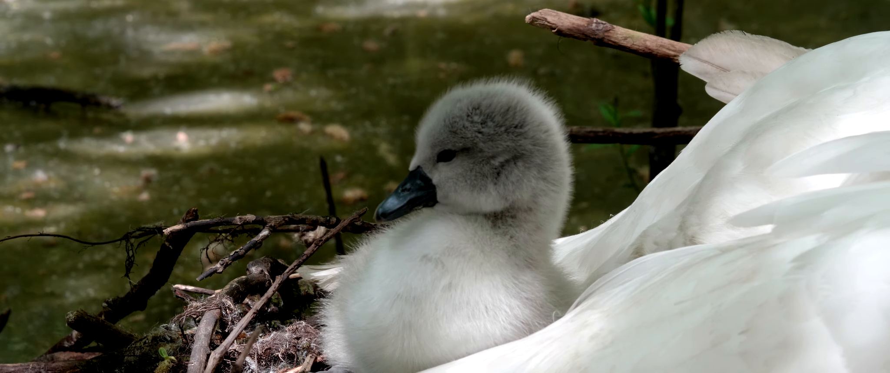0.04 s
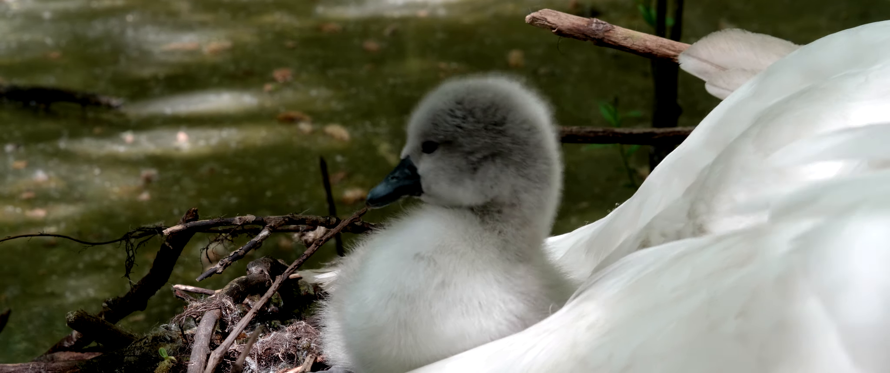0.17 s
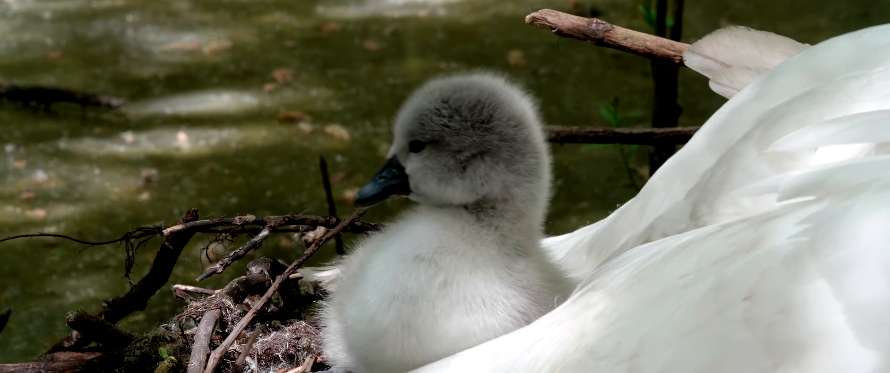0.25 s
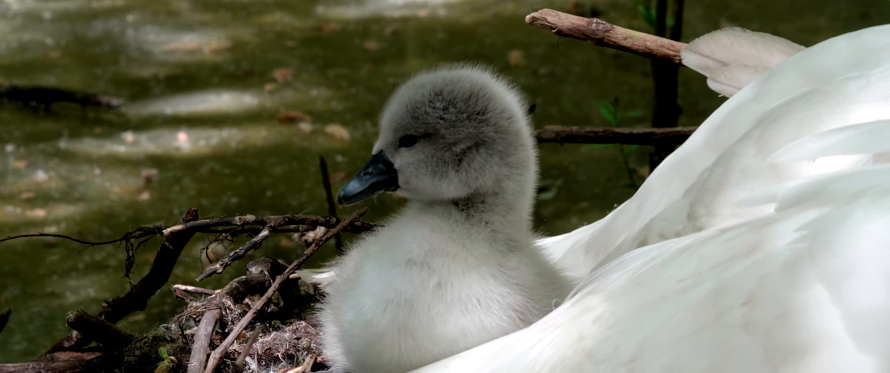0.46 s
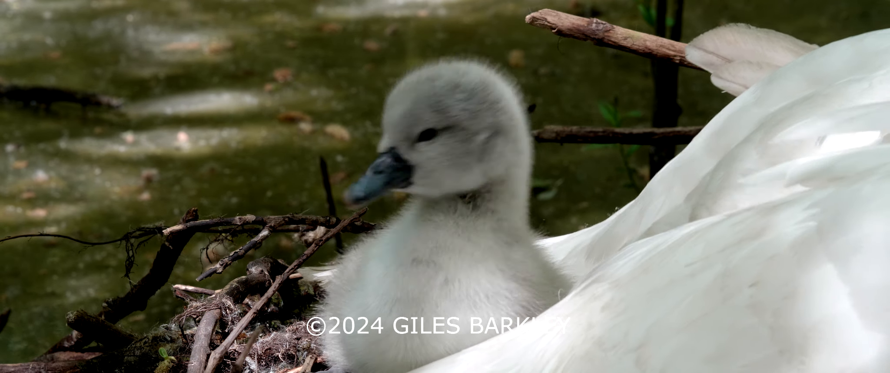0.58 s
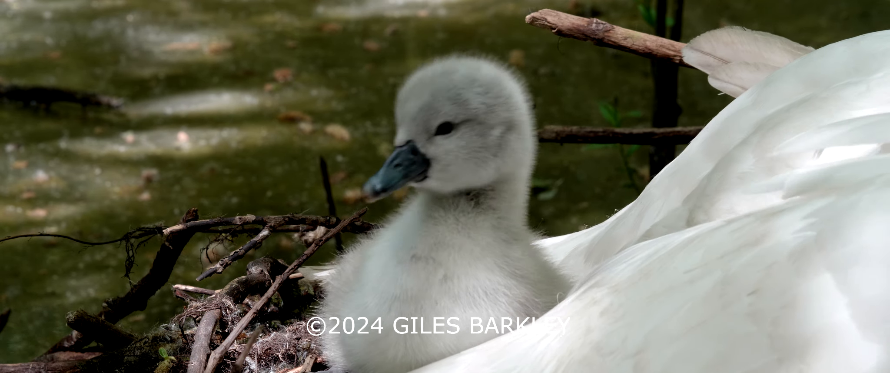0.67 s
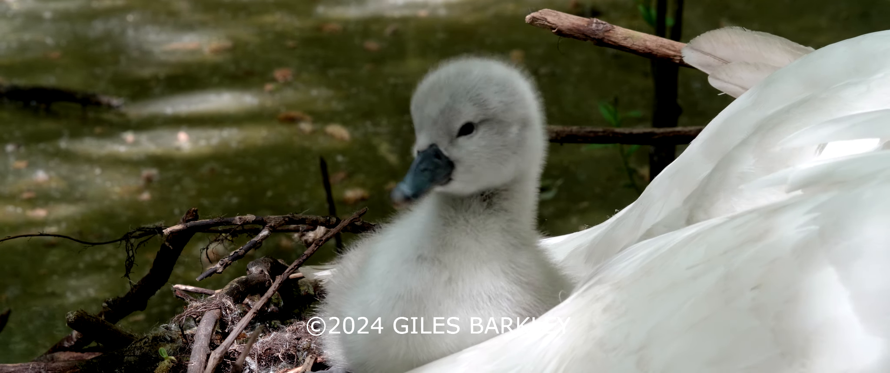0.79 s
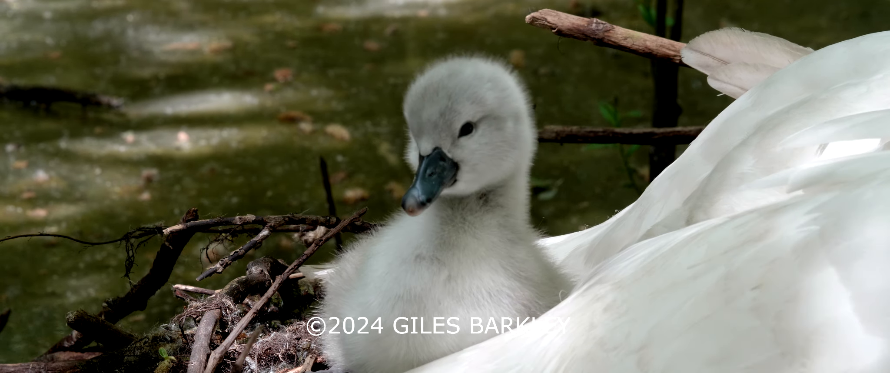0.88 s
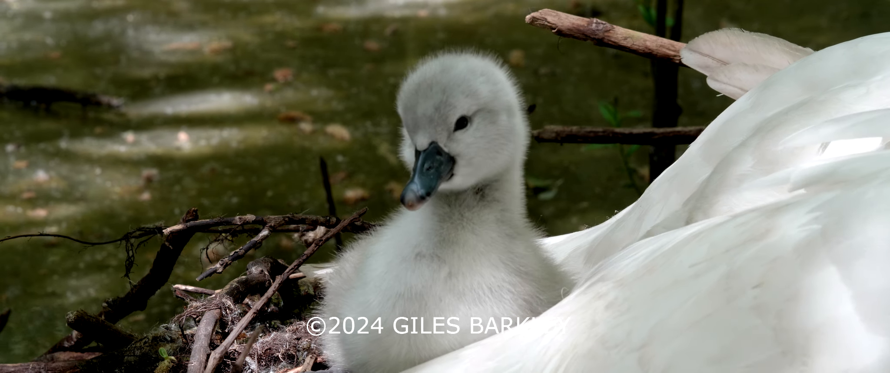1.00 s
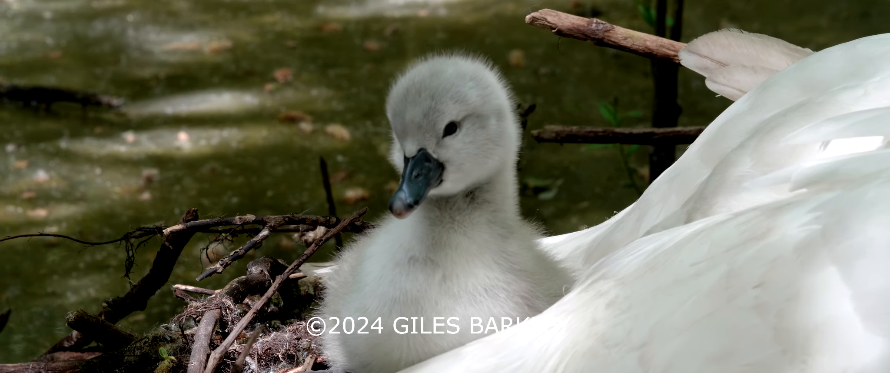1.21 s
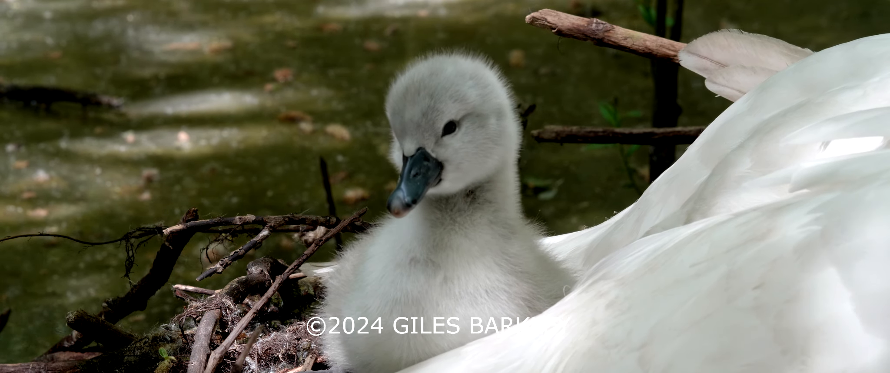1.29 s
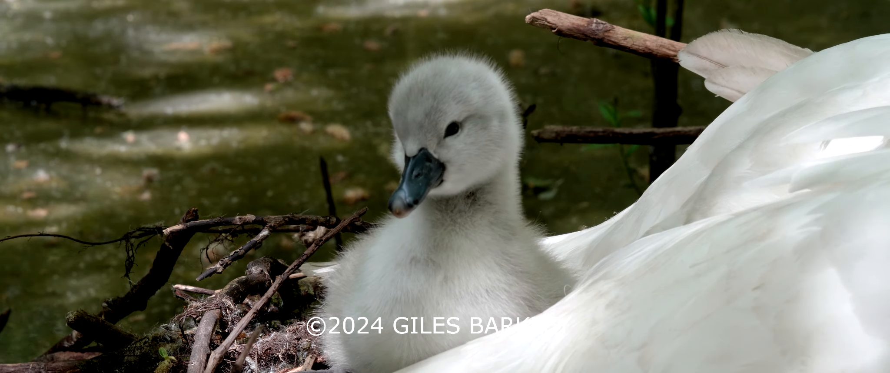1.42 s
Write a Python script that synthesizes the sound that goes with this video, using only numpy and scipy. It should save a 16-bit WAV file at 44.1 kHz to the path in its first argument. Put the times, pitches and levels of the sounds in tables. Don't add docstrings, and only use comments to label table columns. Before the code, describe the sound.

A swan close to the microphone gives a nasal hiss, a brief grunt and two wet, fluttering snorts; small cygnet peeps follow, with far songbirds and a low outdoor rumble by a pond.

```python
import sys
import numpy as np
from scipy import signal
from scipy.fft import rfft, irfft
from scipy.io import wavfile
from scipy.ndimage import uniform_filter1d

SR = 44100
rng = np.random.default_rng(int(sys.argv[2]) if len(sys.argv) > 2 else 0)


def natural_amplitude(level_db):
    exponent = np.asarray(level_db, float) / 20
    return 10 ** exponent


def unload_wav(signal):
    wavfile.write(
        sys.argv[1],
        SR,
        np.round(np.clip(np.atleast_2d(signal).T, -1, 1) * 32767).astype(np.int16),
    )


N = 63945
T = np.arange(N) / SR

VOICE_TOP_HZ, SLAP_TOP_HZ = 3000, 4740
# (time [s], thump [dB], slap [dB], spray [dB], ring of the lowest pipe resonance [dB])
FLAP_HITS = [(0.2815, -41, -40, -44, -38), (0.2962, -8, -24, -19.5, -18.5),
             (.3120, -11.5, -25.5, -25.5, -19), (0.3407, -23, -36, -35.5, -24.5),
             (0.3682, -19.5, -40, -42, -21), (.414, -33, -45, -55.5, -37), (0.5161, -32, -43, -42, -47),
             (.5410, -14.5, -31, -34, -26), (0.5702, -20, -34, -36, -24), (0.588, -30, -30.5, -49, -24),
             (0.5934, -10, -30, -26.5, -17.5), (.600, -26, -48, -45, -21), (0.6186, -22, -35, -36.5, -21),
             (.6400, -15, -24, -39, -31), (0.6694, -25, -39.5, -45, -30), (.7070, -21.5, -36, -47, -22.5),
             (0.756, -36, -44, -57, -34.5), (0.807, -38.5, -55, -78, -38.5),
             (0.864, -36.5, -46.5, -73, -55), (1.302, -57, -67, -58, -60)]
# (frequency [Hz], width [Hz], level [dB])
MOUTH_TONES = [(1806, 260, 6.5), (2470, 180, 9.5), (2860, 260, 7), (3120, 130, -2), (2450, 2100, 0)]


def unit(x):
    return x / np.sqrt(np.mean(x ** 2) + 1e-30)


def curve(rows, col, outside):
    rows = np.array(rows, float)
    return np.interp(T, rows[:, 0], rows[:, col], outside, outside)


def cut(x, hz, kind):
    return signal.sosfilt(signal.butter(2, hz, kind, fs=SR, output="sos"), x)


def ring(x, table):
    out = 0
    for hz, width, db in table:
        turn = 2 * np.pi * hz / SR
        r = np.exp(-np.pi * width / SR)
        tone = signal.lfilter([1], [1, -2 * r * np.cos(turn), r * r], x)
        out = out + natural_amplitude(db) * np.sin(turn) * tone
    return out


def band(x, table):
    return sum(natural_amplitude(db) * signal.lfilter(*signal.iirpeak(hz, hz / width, SR), x) for hz, width, db in table)


def coloured(points):
    f = np.maximum(np.fft.rfftfreq(N, 1 / SR), 1)
    hz, db = np.array(points, float).T
    gain = natural_amplitude(np.interp(np.log(f), np.log(hz), db))
    return unit(irfft(rfft(rng.standard_normal(N)) * gain, N))


def walk(rate):
    k = int(SR / rate)
    steps = np.repeat(rng.standard_normal(N // k + 1), k)
    return unit(uniform_filter1d(uniform_filter1d(steps, k), k)[:N])


def clicks(times, sizes):
    x, at = np.zeros(N + 1), np.asarray(times) * SR
    np.add.at(x, at.astype(int), sizes * (1 - at % 1))
    np.add.at(x, at.astype(int) + 1, sizes * (at % 1))
    return x[:N]


def soften(x):
    window = signal.windows.hann(15)
    return np.convolve(x, window / window.sum(), "same")


def fade(x, seconds):
    return signal.lfilter([1], [1, -np.exp(-1 / (seconds * SR))], x)


def echo(x, t60):
    t = T[:int(SR * .8)]
    h = rng.standard_normal(len(t)) * np.exp(-np.log(1000) * t / t60)
    return signal.fftconvolve(x, h / np.sqrt(np.sum(h ** 2)))[:N]


def air():
    # (frequency [Hz], level [dB])
    air_colour = [(20, 1), (90, 2.5), (350, -5), (800, -9), (1400, -20.5), (3000, -30), (6000, -38.5),
                  (16000, -43)]
    x = coloured(air_colour)
    bass = signal.sosfiltfilt(signal.butter(2, 300, fs=SR, output="sos"), x)
    return natural_amplitude(-43) * (bass * natural_amplitude(1.34 * walk(8.1)) + (x - bass) * natural_amplitude(0.61 * walk(8.0)))


def songbirds(song, wobble_hz, rate, t60, direct_db, trill_depth_hz):
    out = 0
    for start, length, hz, glide_hz, db in song:
        x = np.clip((T - start) / length, 0, 1)
        trill_hz = 250 * (1 + 0.0596 * walk(60))
        trill = np.sin(2 * np.pi * np.cumsum(trill_hz) / SR)
        pitch = hz + glide_hz * (x - .5) + wobble_hz * walk(rate) + trill_depth_hz * trill
        flutter = natural_amplitude(db + 2.5 * walk(60.2))
        edges = np.clip(np.minimum(x, 1 - x) * length / 0.006, 0, 1)
        out = out + flutter * edges * np.sin(2 * np.pi * np.cumsum(pitch) / SR)
    return np.sqrt(2) * (echo(out, t60) + natural_amplitude(direct_db) * out)


def whistles():
    # (start [s], length [s], pitch [Hz], glide [Hz], level [dB])
    whistle_notes = [
        (.045, 0.2, 5070, 5, -65.5),
        (.635, 0.056, 5080, -5.5, -57.5),
        (.70, 0.1, 5070, -8.5, -60),
        (.80, 0.14, 5065, -4, -70.5),
        (1.06, 0.059, 5200, -25, -61.5),
        (1.125, 0.085, 5173, -14.5, -55),
        (1.21, 0.063, 5170, -5.5, -62),
        (1.29, 0.08, 5150, -10, -62.5),
    ]
    return songbirds(whistle_notes, wobble_hz=28, rate=90, t60=0.33, direct_db=-1.5, trill_depth_hz=0)


def warbles():
    # (start [s], length [s], pitch [Hz], glide [Hz], level [dB])
    warble_notes = [
        (.35, 0.167, 3900, -45.5, -57.5),
        (.68, 0.023, 4230, -6, -63),
        (.78, 0.067, 4095, -19.5, -53.5),
        (.875, 0.14, 4230, 20, -51),
        (1.04, 0.19, 4230, -5.5, -63.5),
        (1.25, 0.045, 4235, 22, -50),
        (1.29, 0.22, 4360, 60, -54),
    ]
    return songbirds(warble_notes, wobble_hz=45, rate=120, t60=0.49, direct_db=-7.5, trill_depth_hz=283)


def hiss():
    # (time [s], level [dB])
    breath = [
        (.178, -61),
        (.192, -48),
        (.21, -43.5),
        (.228, -42),
        (.25, -37),
        (.264, -37),
        (.272, -50),
        (.285, -70),
    ]
    # (frequency [Hz], level [dB])
    nostril_colour = [(880, -41), (1500, -1.5), (2450, -5.5), (3540, -5.5), (7080, -7), (10800, -13),
                      (15000, -33)]
    level = curve(breath, 1, -120) + 1.5 * walk(700)
    return cut(natural_amplitude(level) * coloured([(600, -40)] + list(nostril_colour)), 11100, "low")


def peep(rows, octave_db):
    phase = 2 * np.pi * np.cumsum(curve(rows, 1, rows[0][1])) / SR
    size = uniform_filter1d(natural_amplitude(curve(rows, 2, -120)), size=150) * np.sqrt(2)
    return size * (np.sin(phase) + natural_amplitude(octave_db) * np.sin(2 * phase))


def squeak():
    # (time [s], pitch [Hz], level [dB])
    squeak_line = [
        (.184, 2760, -66),
        (.189, 3230, -67),
        (.198, 3700, -62),
        (.201, 3900, -68),
    ]
    return peep(squeak_line, -43)


def grunt():
    # (time [s], pitch [Hz], level [dB], strong-weak alternation [dB])
    voice_line = [
        (.2295, 394, -45, -18),
        (.2335, 391.4, -27.5, 1),
        (.249, 413.4, -18.5, -17),
        (.256, 408, -24.5, 7),
        (.2615, 428, -15, -4),
        (.266, 446, -38, 3),
        (.270, 420, -48, -3),
    ]
    # (frequency [Hz], width [Hz], level [dB])
    throat = [(423, 91, 6), (815, 99, -6), (1696, 170, -14.5), (1870, 160, -21.5)]
    # (frequency [Hz], width [Hz], level [dB])
    half_throat = [(618, 120, -10.5), (1050, 134, -14.5), (1900, 130, -41)]
    # (frequency [Hz], width [Hz], level [dB])
    palate = [(1630, 160, -5), (1840, 96, 3), (2450, 130, -10), (3300, 170, -8.5), (3900, 410, -5)]
    phase = np.cumsum(curve(voice_line, 1, 0)) / SR
    k = np.arange(1, int(phase[-1]))
    jitter, shimmer, scatter = rng.standard_normal((40, 3))[:len(k)].T
    live = T >= voice_line[0][0]
    at = np.interp(k + 0.008 * jitter, phase[live] + 1e-9 * T[live], T[live])
    i = (at * SR).astype(int)
    db = curve(voice_line, 2, -99)[i] + 1.5 * shimmer
    even = ring(clicks(at, natural_amplitude(db + 20.5)), throat)
    alternate_db = db + 23.5 + curve(voice_line, 3, 0)[i]
    uneven = ring(clicks(at, (-1.) ** k * natural_amplitude(alternate_db)), half_throat)
    voice = -np.diff(even + uneven, prepend=0)
    puffs = fade(clicks(at, natural_amplitude(db + 11 + 3.5 * scatter)), 0.00094) * rng.standard_normal(N)
    return cut(cut(voice, VOICE_TOP_HZ, "low") + band(puffs, palate), VOICE_TOP_HZ, "low")


def flow():
    # (time [s], level [dB])
    snort_flows = [
        [(.262, -51), (.275, -37), (.31, -39), (.33, -39), (.35, -43), (.39, -51)],
        [(.52, -44.5), (.55, -39.5), (.585, -41), (.61, -34), (.635, -36.5), (.655, -48), (.69, -51),
         (.73, -54)],
    ]
    rush = sum(natural_amplitude(curve(rows, 1, -120)) for rows in snort_flows)
    rush = uniform_filter1d(rush, size=200) * natural_amplitude(2.5 * walk(122.1))
    pipe_bands = [(480, 120, -0.5), (700, 124, 1.5), (844, 40, -6), (1085, 79, -16.5)]
    pipe = unit(band(rng.standard_normal(N), pipe_bands))
    chest = unit(band(rng.standard_normal(N), [(120, 24, 0)]))
    fizz = unit(cut(band(rng.standard_normal(N), MOUTH_TONES), SLAP_TOP_HZ, "low"))
    return rush * (pipe + natural_amplitude(-11) * fizz) + natural_amplitude(-5.5) * uniform_filter1d(rush, size=600) * chest


def squeezes():
    # (start [s], length [s], start pitch [Hz], end pitch [Hz], level [dB])
    squeeze_tones = [
        (.270, 0.03, 463, 710, -34.5),
        (.574, 0.0168, 480, 776, -36.5),
        (.604, 0.011, 554, 735, -31.5),
        (0.622, 0.016, 508, 773, -33),
        (.652, 0.01, 520, 700, -43),
    ]
    out = 0
    for start, length, low_hz, high_hz, db in squeeze_tones:
        x = np.clip((T - start) / length, 0, 1)
        swell = np.sqrt(np.sin(np.pi * x) + 1e-12) * (x < 1)
        cycles = length * x * (low_hz + (high_hz - low_hz) * x / 2)
        out = out + natural_amplitude(db) * swell * np.sin(2 * np.pi * cycles)
    return out * np.sqrt(2) * natural_amplitude(3 * walk(200))


def windpipe():
    # (time [s], level [dB])
    closing_hits = [(0.291, -14), (.315, -12.5), (0.3384, -21), (0.36, -42), (.530, -24.5), (.5678, -14),
                    (0.598, -36), (0.616, -15), (0.635, -20), (0.641, -22), (.667, -20)]
    # (frequency [Hz], width [Hz], level [dB])
    pipe_tones = [(743, 197, -2.5), (1073, 136, -10), (805, 2700, -19)]
    # (frequency [Hz], width [Hz], level [dB])
    lowest_pipe = [(441, 59, 0)]
    # (frequency [Hz], width [Hz], level [dB])
    chest_tone = [(123.8, 21.7, -17)]
    # (time [s], frequency [Hz], width [Hz], level [dB])
    mouth_pockets = [(.2965, 1840, 130, -15.5), (.2965, 2420, 150, -22), (.3125, 2590, 100, -28.5),
                     (.5415, 2940, 170, -29), (0.5417, 2380, 150, -29), (0.5881, 2930, 250, -26),
                     (.594, 2330, 130, -25), (.594, 1040, 150, -30), (.646, 970, 250, -20.5),
                     (.594, 3370, 130, -23), (.6405, 2385, 110, -21.5), (0.6401, 2940, 260, -19),
                     (.646, 2420, 120, -37), (.619, 8800, 500, -28), (0.7066, 2270, 200, -32),
                     (.671, 3000, 200, -35)]
    at, thump_db, _, _, low_db = np.array(FLAP_HITS, float).T
    knocks = clicks(at, natural_amplitude(thump_db))
    out = ring(soften(knocks), pipe_tones)
    out = out + cut(ring(clicks(at, natural_amplitude(low_db)), lowest_pipe), VOICE_TOP_HZ, "low")
    for s, hz, width, db in mouth_pockets:
        out = out + cut(ring(clicks([s], natural_amplitude(db)), [(hz, width, 0)]), 1.19 * hz, "low")
    shut_at, shut_db = np.array(closing_hits, float).T
    push = soften(soften(clicks(shut_at, -natural_amplitude(shut_db))))
    out = out + ring(push, pipe_tones) + natural_amplitude(-4) * ring(push, lowest_pipe)
    return cut(out, 275, "high") + ring(knocks, chest_tone)


def wet_burst(db, seconds, table, top_hz):
    at, thump_db = np.array(FLAP_HITS, float).T[:2]
    rise_s = 0.00017
    hit = clicks(at + 0.00023, natural_amplitude(db))
    gate = fade(fade(hit, seconds), rise_s) / (rise_s * SR) * 1.16
    tick_db = db + 11.5 + 0.37 * (thump_db - thump_db.max())
    tick = clicks(at + 0.000447, -natural_amplitude(tick_db))
    noise = rng.standard_normal(N)
    burst = cut(cut(band(gate * noise + tick, table), top_hz, "low"), 12200, "low")
    return burst / np.std(band(noise, table)) * 1.107


def slaps_and_spray():
    # (frequency [Hz], width [Hz], level [dB])
    bill_tones = [(5060, 630, 13), (6200, 660, 14.5), (7230, 1700, 8.5), (8730, 330, 14.5),
                  (7000, 5900, -32), (12900, 2100, -8)]
    _, _, slap_db, spray_db, _ = np.array(FLAP_HITS, float).T
    slap = wet_burst(slap_db, 0.0033, MOUTH_TONES, SLAP_TOP_HZ)
    return slap + wet_burst(spray_db, 0.002, bill_tones, 9500)


def cygnets():
    # (time [s], pitch [Hz], level [dB])
    first_peep = [
        (0.395, 1846, -60),
        (0.405, 2035, -53.5),
        (0.435, 2605, -50.5),
        (0.465, 2828, -56),
        (0.477, 2670, -49.5),
        (0.489, 2040, -55),
        (0.497, 1760, -59),
    ]
    # (time [s], pitch [Hz], level [dB])
    second_peep = [
        (1.128, 1501, -55),
        (1.138, 1617, -52.5),
        (1.166, 1750, -52.5),
        (1.184, 1810, -56),
        (1.192, 1560, -56),
        (1.198, 1568, -66),
    ]
    # (time [s], pitch [Hz], level [dB])
    third_peep = [
        (1.318, 1950, -66),
        (1.326, 1860, -54),
        (1.368, 2356, -57),
        (1.388, 2430, -52.5),
        (1.4, 2300, -59),
        (1.412, 1893, -65),
        (1.415, 1859, -75),
    ]
    # (time [s], pitch [Hz], level [dB])
    fourth_peep = [
        (1.335, 1656, -70),
        (1.34, 1600, -44.5),
        (1.357, 1740, -41.5),
        (1.375, 1736, -41),
        (1.384, 1480, -47.5),
        (1.39, 1554, -70),
    ]
    octaves = (-43, -16, -40, -15, -43)
    peeps = (first_peep, second_peep, third_peep, fourth_peep)
    return sum(peep(rows, octave_db) for rows, octave_db in zip(peeps, octaves))


def scene():
    far = air() + whistles() + warbles()
    swan = hiss() + squeak() + grunt() + flow() + squeezes() + windpipe() + slaps_and_spray()
    near = swan + cygnets()
    scatter = natural_amplitude(-12.5) * cut(echo(near, 0.21), 3770, "low")
    return (near + scatter + far)[None, :]


def low_pass(x):
    return signal.sosfilt(signal.butter(12, 16210, fs=SR, output="sos"), x)


def record(dry):
    mix = signal.sosfilt(signal.ellip(8, .2, 70, 16150, fs=SR, output="sos"), dry)
    return low_pass(mix)


dry = scene()
out = record(dry)
unload_wav(out)
```